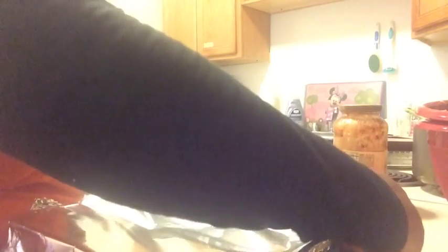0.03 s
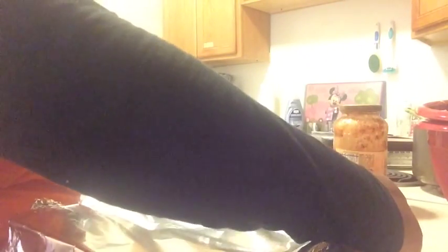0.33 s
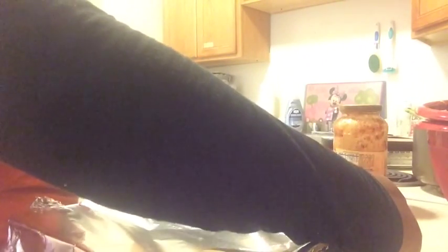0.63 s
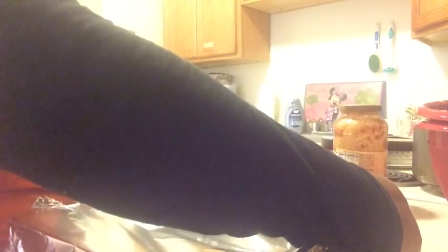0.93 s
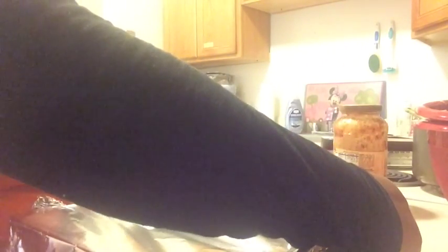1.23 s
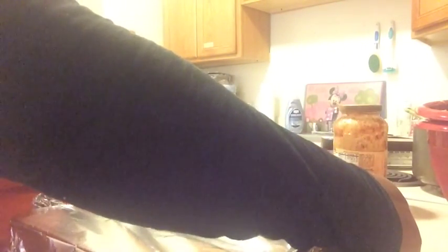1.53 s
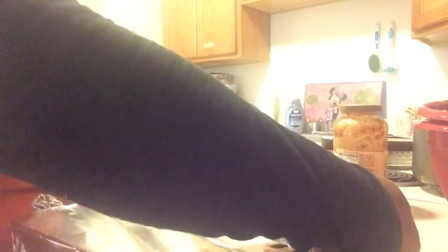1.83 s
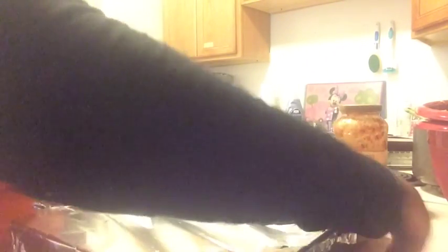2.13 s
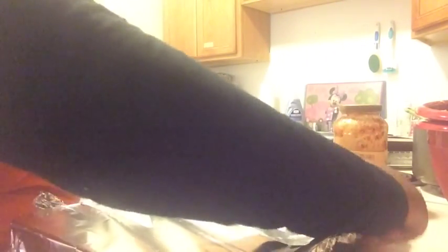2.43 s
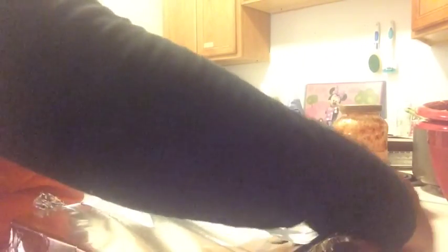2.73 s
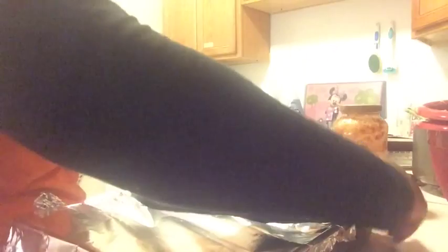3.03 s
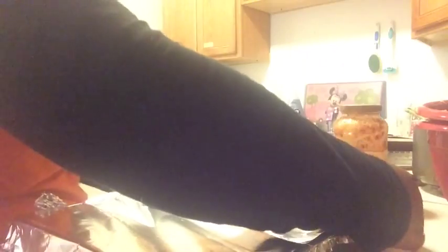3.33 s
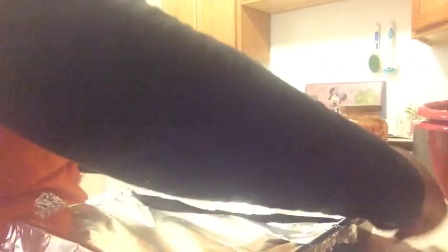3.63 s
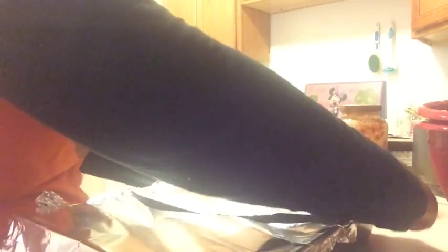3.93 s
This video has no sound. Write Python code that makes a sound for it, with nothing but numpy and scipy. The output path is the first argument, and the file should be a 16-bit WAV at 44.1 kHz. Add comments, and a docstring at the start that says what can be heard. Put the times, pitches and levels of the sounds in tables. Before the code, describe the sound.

Aluminium foil crinkles loudly as hands press it around a tray.

```python
"""Folding foil round a tray

Hands press aluminium foil round a tray on a kitchen counter, an arm shielding the microphone.
Each press is a shower of tiny buckles; single creases snap, facets crack, whole panels flex with a
dull pop, and the tray knocks. The small room throws it all back, over an appliance's hum and rumble."""
import sys
import numpy as np
from scipy import signal
from scipy.fft import rfft, irfft, next_fast_len
from scipy.io import wavfile
from scipy.ndimage import uniform_filter1d

SR = 44100
rng = np.random.default_rng(int(sys.argv[2]) if len(sys.argv) > 2 else 0)


def master_out(mix):
    """Clip the mix to full scale and print it as 16-bit PCM to the path in sys.argv[1]."""
    frames = np.transpose(np.atleast_2d(mix))
    ceiling = np.clip(frames, -1, 1)
    pcm = np.round(ceiling * 32767).astype(np.int16)
    wavfile.write(sys.argv[1], SR, pcm)


N = 176400

# presses of the foil: t/s, length/s, level/dB, extra treble/dB, extra body/dB
PRESSES = [(0, 0.043, -30.5, -4, -3.5), (0.035, 0.055, -24, 2.5, -0.5), (0.091, 0.022, -32.5, 6.5, 1),
           (0.228, 0.05, -37.5, 1, 4), (0.263, 0.025, -34, -1, -3), (0.303, 0.029, -40, 3.5, 2),
           (0.424, 0.01, -43.5, 10, 9), (0.46, 0.08, -32.5, 3.5, 3.5), (0.535, 0.1, -32, 1, 4.5),
           (0.634, 0.037, -34.5, -4, 1.5), (0.717, 0.045, -29, 0, 0.5), (0.792, 0.04, -28.5, -1, 1.5),
           (0.854, 0.05, -40, -8, -9), (0.895, 0.063, -30, -0.2, -0.5), (0.946, 0.028, -30, 2.5, -1.5),
           (1.086, 0.038, -34.5, 2, 5), (1.116, 0.04, -25, 0.5, -2.5), (1.244, 0.037, -34, -14, 3),
           (1.275, 0.03, -30.5, 0, 5), (1.348, 0.02, -39.5, 0, 10), (1.387, 0.032, -43, -2, 7),
           (1.435, 0.015, -34, -6, 11.5), (1.497, 0.053, -43, -7, 6), (1.552, 0.0091, -36, -7, 8.5),
           (1.58, 0.012, -33.5, 0, 7.5), (1.635, 0.015, -27, 2, 4), (1.651, 0.064, -26, 1, -2),
           (1.721, 0.051, -29.4, 1, 3), (1.904, 0.025, -44.5, -11, 4), (1.952, 0.12, -40.5, -4, 5),
           (2.009, 0.03, -27.5, 1.5, -0.5), (2.25, 0.055, -38.5, -3, 5), (2.277, 0.049, -30.5, -2, -3),
           (2.329, 0.066, -34.5, -2, 4.5), (2.372, 0.077, -31.5, 0.5, -1), (2.452, 0.11, -33.5, -2, 1.5),
           (2.55, 0.049, -30.5, 0, -0.5), (2.648, 0.039, -42.5, -11, 6), (2.682, 0.078, -40, -5, 6.5),
           (2.782, 0.04, -31, -8, 1.5), (2.813, 0.06, -30, 1, -2), (2.96, 0.066, -52, 2, 5),
           (3.052, 0.087, -33, -5.5, 3), (3.133, 0.057, -35.5, -9, 4.5), (3.186, 0.035, -31, -0.5, 2),
           (3.228, 0.059, -26.5, -2, 1.5), (3.311, 0.046, -29.5, -3, 3), (3.407, 0.032, -34, -3.5, 7),
           (3.468, 0.012, -38, 2, 0), (3.504, 0.056, -38.5, -5, 7.5), (3.552, 0.022, -29, -4, 1.5),
           (3.594, 0.022, -38.5, -6, 6.5), (3.647, 0.017, -20, -15, -6), (3.816, 0.068, -37, -7, 6),
           (3.846, 0.1, -30, -1.5, -0.2), (3.937, 0.021, -30, 9.5, 0.5)]
ROOM_SAMPLES = 20000


def amp(db):
    return 10 ** (np.asarray(db) / 20)


def unit(x):
    """Scales to rms 1."""
    return x / np.sqrt(np.mean(x ** 2) + 1e-20)


def curve_at(points, hz):
    """Reads a table on a log-frequency axis."""
    f, value = np.transpose(points)
    return np.interp(np.log(hz + 1), np.log(f + 1), value)


def add(mix, s, sound):
    """Mixes a sound in at s seconds."""
    at = round(s * SR)
    sound = sound[..., max(-at, 0):]
    part = mix[..., max(at, 0):][..., :sound.shape[-1]]
    part += sound[..., :part.shape[-1]]


def noise(gain):
    """Noise of rms 1, coloured by a gain given as a function of frequency."""
    spectrum = rfft(rng.standard_normal(N), 2 * N)
    return unit(irfft(spectrum * gain(np.fft.rfftfreq(2 * N, 1 / SR)))[:N])


def drift(hz):
    """Slow random movement below hz, rms 1."""
    return noise(lambda f: 1 / (1 + (f / hz) ** 4))


def room():
    """One path to the microphone: shielded direct sound, echoes off counter and tray, then the kitchen."""
    # kitchen reverb: f/Hz, t60/s
    kitchen = [(200, 0.3), (1000, 0.24), (4000, 0.21), (8000, 0.18), (16000, 0.13)]
    size, early_decay_s, late_rise_s = ROOM_SAMPLES, .0087, .0065
    t = np.arange(size) / SR
    early = rng.standard_normal(size) * (rng.random(size) < .1) * np.exp(-t / early_decay_s)
    taps = rng.standard_normal(size) * (rng.random(size) < .15) * np.minimum(t / late_rise_s, 1)
    hz, frame_s, spectra = signal.stft(taps, SR, nperseg=256)
    decay = amp(-60 * frame_s / curve_at(kitchen, hz)[:, None])
    late = signal.istft(spectra * decay, SR)[1][:size]
    path = amp(-2) * early / np.linalg.norm(early) + amp(-5) * late / np.linalg.norm(late)
    path[0] += amp(-8)  # direct sound
    return path / np.linalg.norm(path)


def reverb(sound, send_db):
    """A sound as it comes back along one path through the room."""
    return amp(send_db) * signal.fftconvolve(sound, room())[:N]


def appliance():
    """Wavering motor tones in the steady rumble of fan and room."""
    # motor tones: f/Hz, rms level/dB, unsteady share
    hum = [(119.35, -34.5, 0.15), (129.2, -41.5, 0.87), (156.1, -44.5, 0.34), (181.6, -49, .6),
           (256.3, -53.5, 0.22), (382.4, -57, 0.46)]
    # chance ups and downs in the level of the low hum, scaled by wobble_depth: t/s, relative level/dB
    ups_and_downs = [(0.0, -26), (0.05, -35), (0.11, -45), (0.15, -30.5), (0.98, -39), (1.11, -29),
                     (1.36, -43), (1.44, -32.5), (1.97, -30.5), (1.99, -45), (2.06, -24), (2.21, -37),
                     (3.3, -30.5), (3.35, -45), (3.41, -30), (3.78, -39.5), (3.82, -24), (4.0, -50)]
    # rumble spectrum: f/Hz, relative level/dB
    rumble_colour = [(20, -19), (35, -13), (58, -3.5), (75, -2.5), (100, 0.5), (130, 6.5), (175, -4),
                     (210, -9.5), (420, -11.5), (700, -15.5), (1150, -15), (1700, -19), (3000, -26),
                     (6500, -40), (16000, -51)]
    waver_hz, wobble_depth = 5.4, .67
    t = np.arange(N) / SR
    tones = []
    for hz, db, unsteady in hum:
        waver = 1 - unsteady + unsteady * (drift(waver_hz) + 1j * drift(waver_hz)) / 2
        tone = waver * np.exp(2j * np.pi * (hz * t + rng.random()))
        tones.append(amp(db) * unit(tone.real))
    wobble = unit(amp(wobble_depth * np.interp(t, *np.transpose(ups_and_downs))))
    rumble = amp(-37) * noise(lambda f: amp(curve_at(rumble_colour, f)))
    return wobble * sum(tones[:2]) + sum(tones[2:]) + rumble


def tray_knocks():
    """The tray is nudged; where it is hit decides how strongly each mode rings."""
    # knocks on the counter: t/s, level/dB
    knocks = [(2.729, -24.5), (3.129, -24), (3.447, -26.5)]
    # tray modes: f/Hz, level/dB, t60/s
    modes = [(488, -2, 0.045), (585, -2, 0.038), (815, -6, 0.04), (980, -1, .025)]
    rise_s = .0019
    out, t = np.zeros(N), np.arange(0, .08, 1 / SR)
    for start, db in knocks:
        ring = 0
        for hz, mode_db, t60 in modes:
            decay = amp(mode_db + rng.uniform(-2.3, 1.7) - 60 * t / t60)
            ring += decay * np.sin(2 * np.pi * (hz * t + rng.random()))
        add(out, start, amp(db) * np.minimum(t / rise_s, 1) * ring)
    return out + reverb(out, send_db=-9)


def panel_flex(db, hz):
    """A whole panel of foil flips and rings for a few cycles, never twice the same."""
    # panel modes: multiple of the pitch, level/dB, t60/s
    modes = [(.6, -11, 0.016), (.8, -4.5, 0.015), (1, 1.5, 0.018), (1.25, -3.5, 0.018), (1.7, -8, 0.0082)]
    detune, rise_s = .037, .0011
    t = np.arange(0, .05, 1 / SR)
    ring = 0
    for ratio, mode_db, t60 in modes:
        mode_hz = hz * ratio * (1 + detune * rng.uniform(-1, 1))
        ring += amp(mode_db - 60 * t / t60) * np.sin(2 * np.pi * (mode_hz * t + rng.random()))
    return amp(db) * np.minimum(t / rise_s, 1) * ring


def panel_pops():
    """Dull pops: the big flexes, and smaller ones scattered through the presses."""
    # big flexes: t/s, relative level/dB, f/Hz
    pops = [(1.64, -27, 960), (1.699, -24, 880), (2.018, -22, 1000), (2.8, -25, 1090), (2.847, -25, 926),
            (3.099, -24, 1115), (3.116, -25, 890), (3.25, -29, 1015), (3.353, -23.5, 1440),
            (3.413, -24.5, 930), (3.514, -26, 1000), (3.56, -18.5, 1050)]
    flexes_per_s, tries, centre_hz, spread_octaves = 30, 6, 1000, .53
    out = np.zeros(N)
    for start, db, hz in pops:
        add(out, start, panel_flex(db + 2, hz))
    for start, length, db, _, body_db in PRESSES:
        for place, chance, size, pitch in rng.random((tries, 4)):
            hz = centre_hz * 2 ** (spread_octaves * (2 * pitch - 1))
            pop = panel_flex(db + body_db - 6 * (1 - size), hz)
            if chance < flexes_per_s * length / tries:
                add(out, start + place * length, pop)
    return .91 * out + reverb(out, send_db=-6)


def facet_cracks():
    """A facet in plain view of the microphone flips: a brittle ring of a few cycles, nearly dry."""
    # close cracks: t/s, peak level/dB, f/Hz
    cracks = [(.957, -16, 7000), (1.086, -21, 10000), (1.588, -17, 8500), (1.66, -14, 7000),
              (2.574, -20, 5500), (3.177, -22, 11000), (3.209, -14.5, 7400), (3.2296, -8.5, 4400),
              (3.317, -9, 4400), (3.356, -23, 6000), (3.66, -17, 7000)]
    decay_s = .00071
    out, t = np.zeros(N), np.arange(0, .008, 1 / SR)
    for start, db, hz in cracks:
        partials_hz = hz * 2 ** rng.uniform(-.515, .5, (6, 1))
        partials = np.sin(2 * np.pi * (partials_hz * t + rng.random((6, 1))))
        ring = partials.sum(0) * np.exp(-t / decay_s)
        add(out, start, amp(db) * ring / abs(ring).max())
    return out + reverb(out, send_db=-10)


def buckles(envelope, per_s):
    """Clumps of very unequal clicks; a big one uses up the strain, so its neighbours are weaker."""
    clump_s, clump_db, spread_db, ceiling_db, strain_s = .004, 3, 5, 16, .024
    n = len(envelope)
    clumps = unit(uniform_filter1d(rng.standard_normal(n), int(clump_s * SR)))
    size = amp(np.minimum(spread_db * rng.exponential(1, n) + clump_db * clumps, ceiling_db))
    clicks = unit(size * rng.choice([-1, 1], n) * (rng.random(n) < per_s / SR))
    spent = uniform_filter1d(clicks ** 2, int(strain_s * SR))
    return unit(clicks / np.sqrt(spent + .1) * envelope) * np.sqrt(np.mean(envelope ** 2))


def settling():
    """Stray ticks of settling foil, pausing while the hands let go."""
    t = np.arange(N) / SR
    touched = (t < 2.06) | (t > 2.245)
    return amp(-56) * buckles(touched.astype(float), per_s=110)


def crease_snaps():
    """Single creases snap in dense bursts of clicks. Rows: body, middle, treble."""
    # snaps: t/s, relative level/dB, treble offset/dB, build-up/s
    snaps = [(.306, -15.5, -10, 0.0022), (.405, -28.5, 0, 0.0018), (1.083, -14, 2.5, 0.0025),
             (1.115, -15, 9, 0.0017), (1.344, -16, 2.5, 0.0037), (1.435, -12.5, 3, 0.0022),
             (1.557, -15.5, 5, 0.0015), (1.585, -7.5, 1.5, 0.0014), (1.658, -7, 4, 0.002),
             (1.829, -21.5, -1, .001), (1.942, -18.5, 1, 0.0019), (2.012, -10.5, 1.5, 0.0043),
             (2.499, -15.5, 3, 0.00093), (2.683, -18.5, -0.5, 0.0017), (3.074, -13.5, -0.5, .002),
             (3.316, -11, -2, 0.0016), (3.382, -15, 0, 0.0022), (3.658, -5.5, 0.5, 0.0017),
             (3.885, -11, 7.5, 0.0014)]
    out, t = np.zeros((3, N)), np.arange(0, .025, 1 / SR)
    for start, db, treble_db, build_s in snaps:
        burst = buckles(t / build_s * np.exp(1 - t / build_s), per_s=6000)
        band_db = np.array([[-12], [-11], [treble_db - 13]])
        add(out, start, amp(db + band_db) * burst)
    return out


def air_pocket(clicks):
    """The hollow under a pressed panel favours one pitch, different with each press."""
    hz = 1050 * 2 ** (.54 * rng.uniform(-1, 1))
    ring = signal.lfilter(*signal.iirpeak(hz, Q=3.8, fs=SR), clicks)
    return amp(-2.5) * clicks + amp(1) * ring


def finger_presses():
    """Showers of clicks; a harder press buckles more facets a second. Rows: body, middle, treble."""
    lead_s, release_s, sag_db = .015, .0073, -1.5
    usual_db, usual_per_s = -31, 1400
    out = np.zeros((3, N))
    for start, length, db, treble_db, body_db in PRESSES:
        t = np.arange(-lead_s, length + 4 * release_s, 1 / SR)
        rise_s = .0046 + .13 * length
        attack = (1 + np.tanh(t / rise_s - .5)) / 2
        release = np.exp(-np.maximum(t - length, 0) / release_s)
        sag = amp(sag_db * (t / length - 1))
        per_s = usual_per_s * amp(.9 * (db - usual_db))
        clicks = amp(db) * buckles(attack * release * sag, per_s)
        bands = np.array([amp(body_db) * air_pocket(clicks), clicks, amp(treble_db) * clicks])
        add(out, start - lead_s, bands)
    return out


def crinkle(patches=14):
    """The clicks ring on patches of foil, each with its own pitch and its own path through the room."""
    # overall tone of the foil: f/Hz, gain/dB
    foil_colour = [(100, -16), (250, -5), (500, -2.5), (700, -1.5), (1000, 3), (1300, 1), (1650, -2),
                   (2050, 0), (2450, -2), (3200, 2.5), (4200, 1.5), (5600, 0), (7500, 1.5), (8700, -3),
                   (10700, -2.5), (12000, -5), (15500, -6)]
    body_hz, treble_hz = 1550, 6000  # crossovers
    centre_hz, spread_octaves, resonance_db = 4280, 1.552, 5
    clicks = settling() + finger_presses() + crease_snaps()
    size = next_fast_len(N + ROOM_SAMPLES)
    hz = np.fft.rfftfreq(size, 1 / SR)
    body = 1 / (1 + (hz / body_hz) ** 6)
    treble = 1 - 1 / (1 + (hz / treble_hz) ** 6)
    bands = np.array([amp(5.5) * body, amp(6) * (1 - body - treble), amp(6.5) * treble])
    fingers = 4 * drift(hz=5)  # they wander from patch to patch
    patch = np.round(fingers + 1.3 * rng.standard_normal(N)) % patches  # clicks land around them
    spectrum = 0
    for k, octave in enumerate(rng.permutation(np.linspace(-spread_octaves, spread_octaves, patches))):
        peak = 1 / (1 + (np.log2((hz + 1) / centre_hz) - octave) ** 2 / .034)
        patch_clicks = (bands * rfft(clicks * (patch == k), size)).sum(0)
        spectrum += patch_clicks * amp(resonance_db * (peak - .22)) * rfft(room(), size)
    return irfft(spectrum * amp(curve_at(foil_colour, hz)), size)[:N]


def scene():
    """Foil, tray and appliance in mono."""
    return (crinkle() + facet_cracks() + panel_pops() + tray_knocks() + appliance())[None]


def record(dry):
    """A steep low-pass takes off the very top."""
    lowpass = signal.firwin(301, cutoff=15700, window=("kaiser", 9), fs=SR)
    return signal.oaconvolve(dry, lowpass[None], "same")


dry = scene()
out = record(dry)
master_out(out)
```